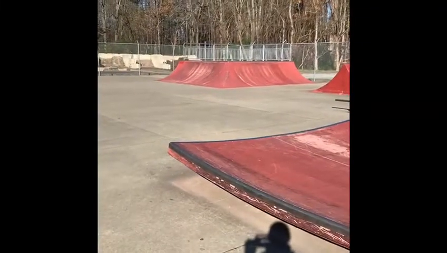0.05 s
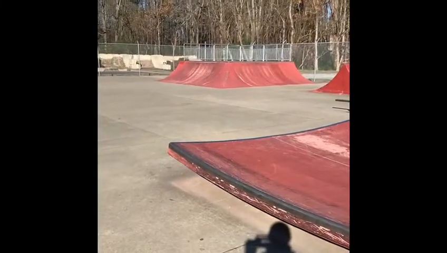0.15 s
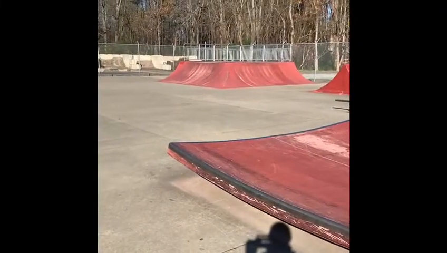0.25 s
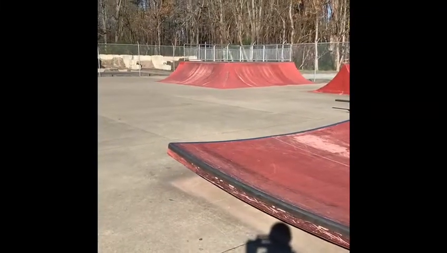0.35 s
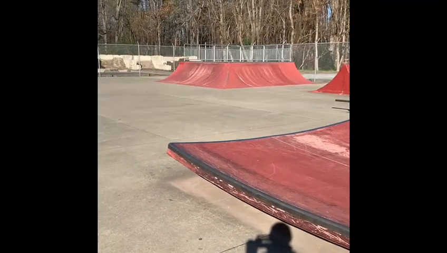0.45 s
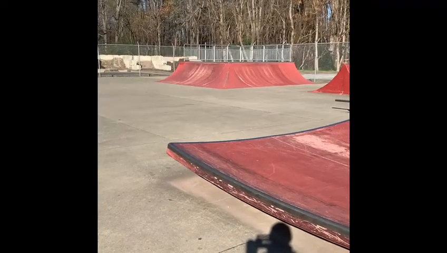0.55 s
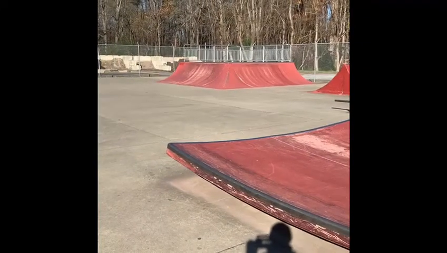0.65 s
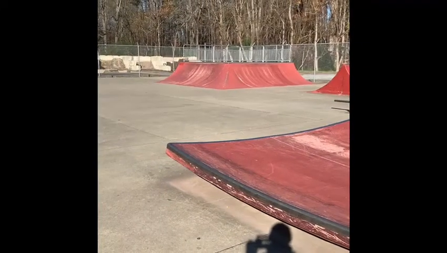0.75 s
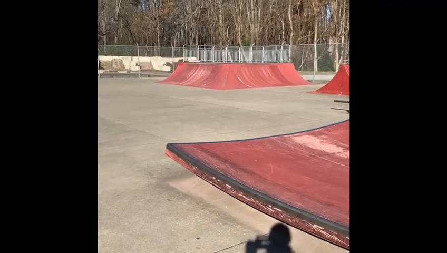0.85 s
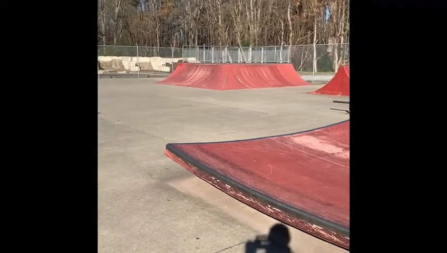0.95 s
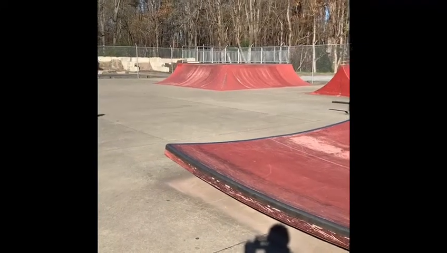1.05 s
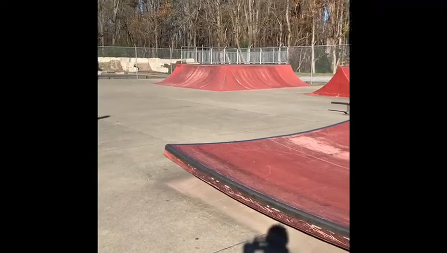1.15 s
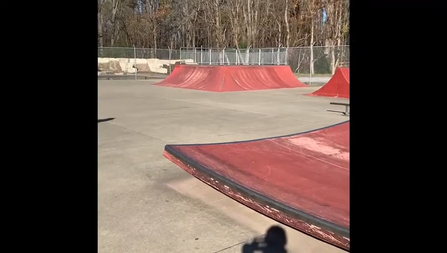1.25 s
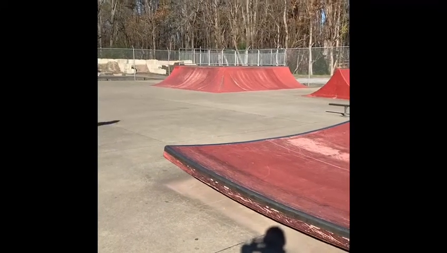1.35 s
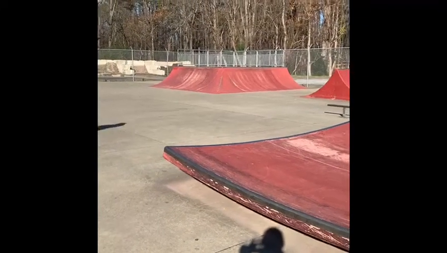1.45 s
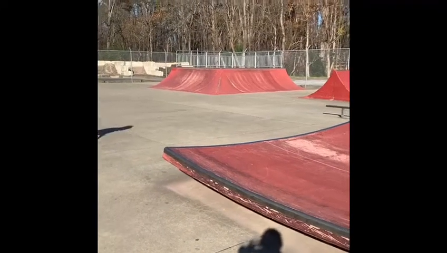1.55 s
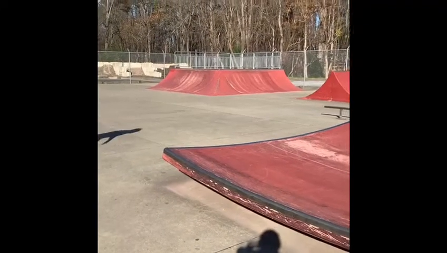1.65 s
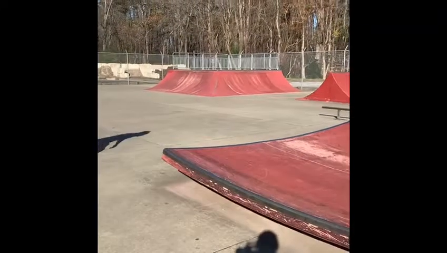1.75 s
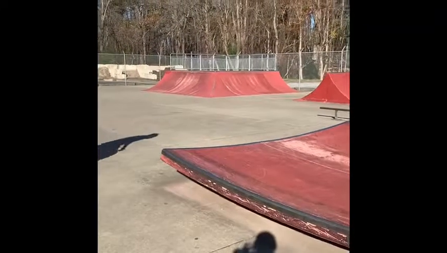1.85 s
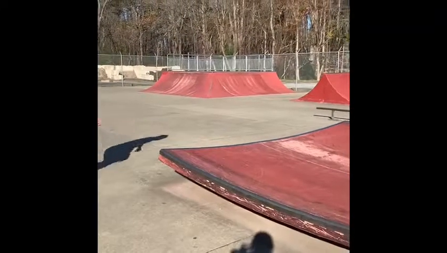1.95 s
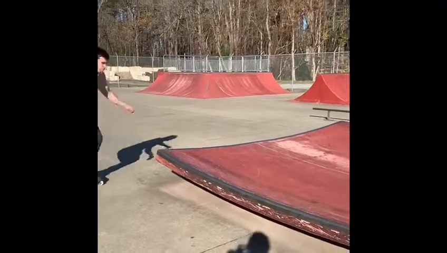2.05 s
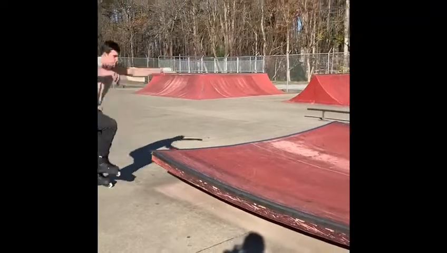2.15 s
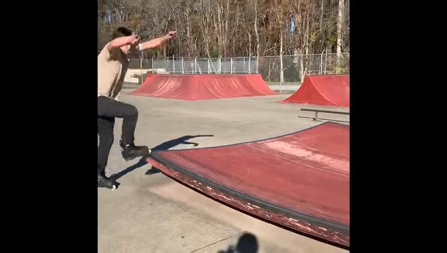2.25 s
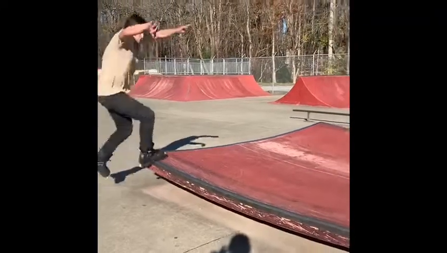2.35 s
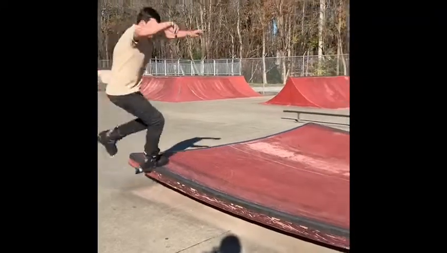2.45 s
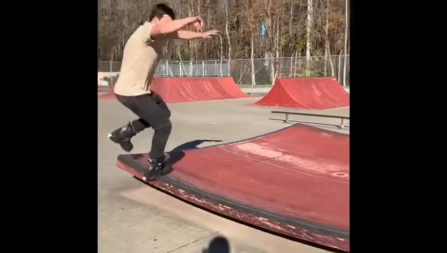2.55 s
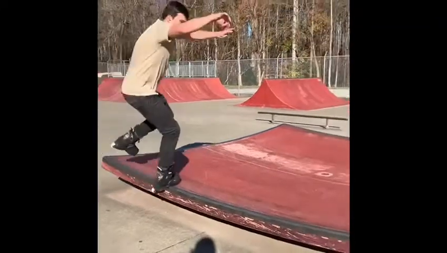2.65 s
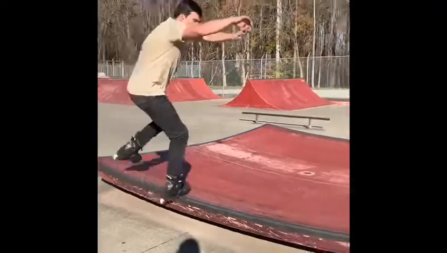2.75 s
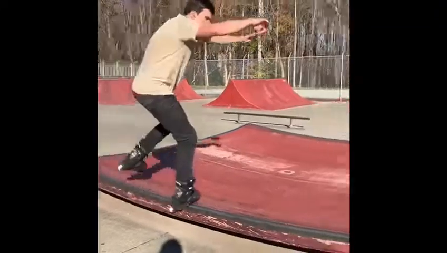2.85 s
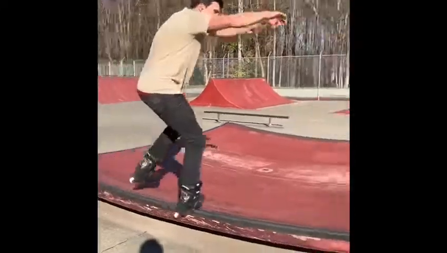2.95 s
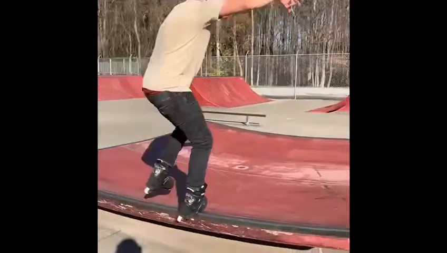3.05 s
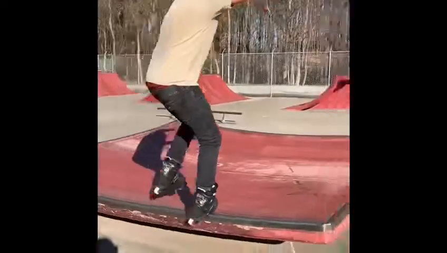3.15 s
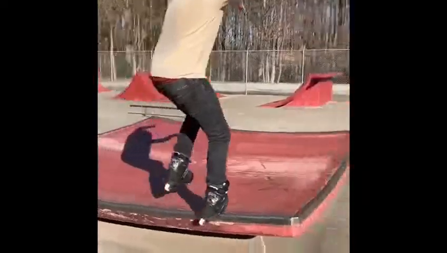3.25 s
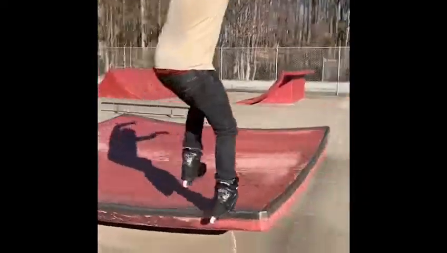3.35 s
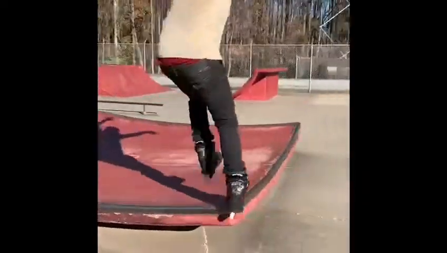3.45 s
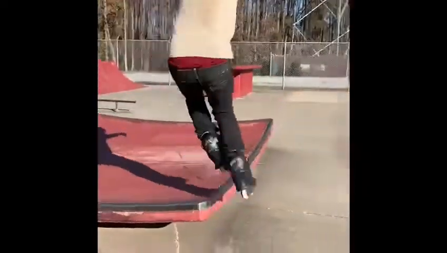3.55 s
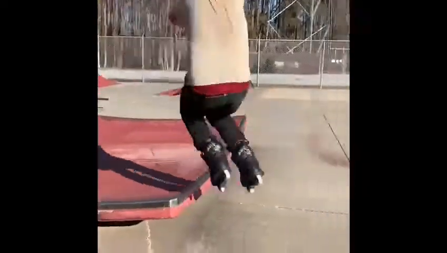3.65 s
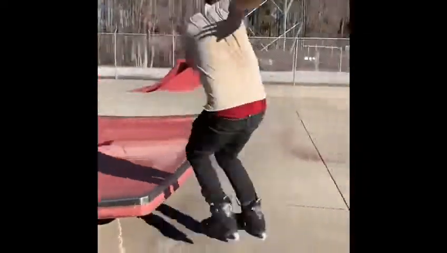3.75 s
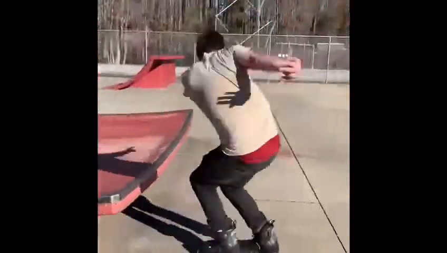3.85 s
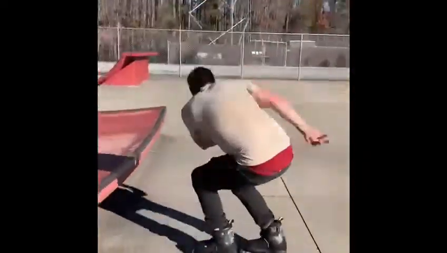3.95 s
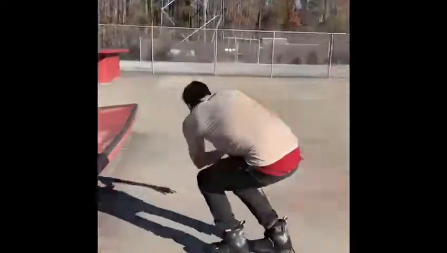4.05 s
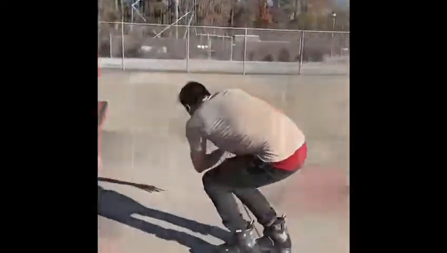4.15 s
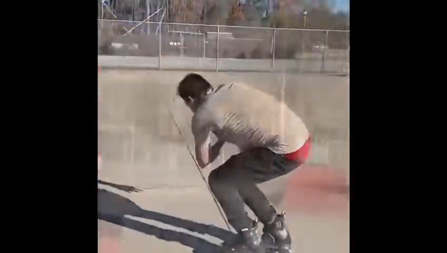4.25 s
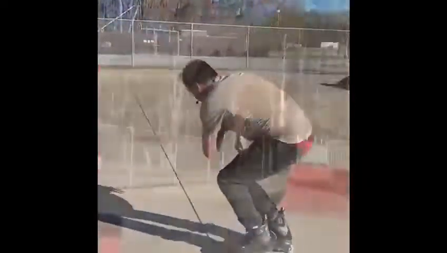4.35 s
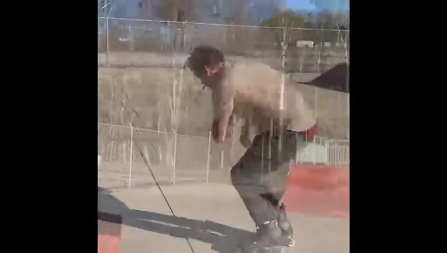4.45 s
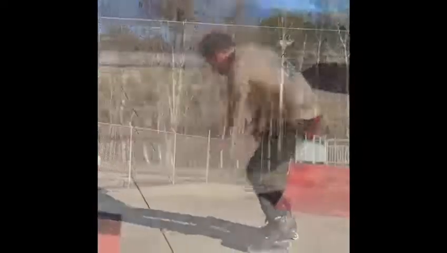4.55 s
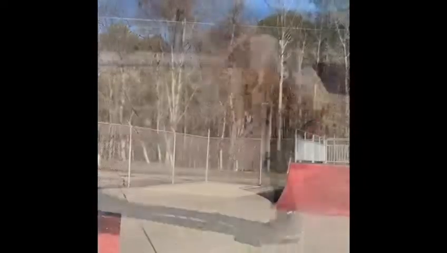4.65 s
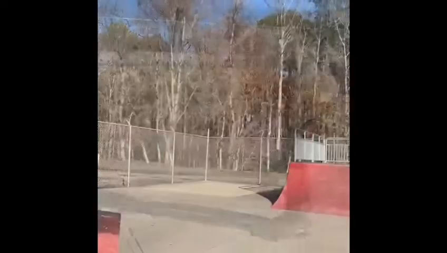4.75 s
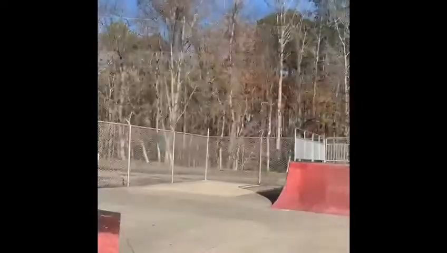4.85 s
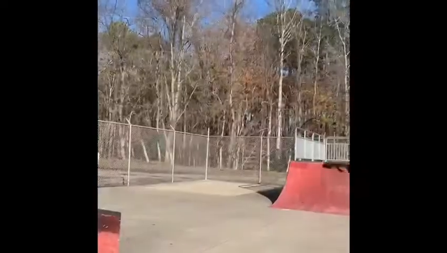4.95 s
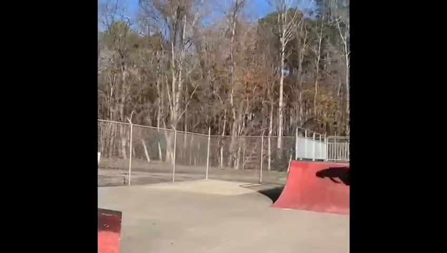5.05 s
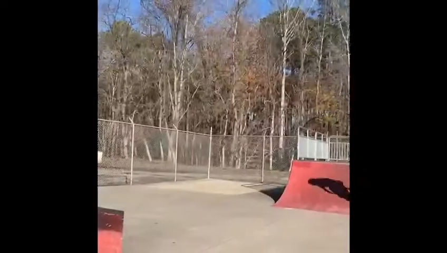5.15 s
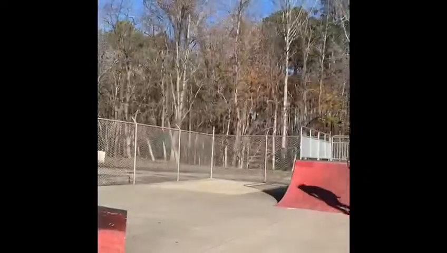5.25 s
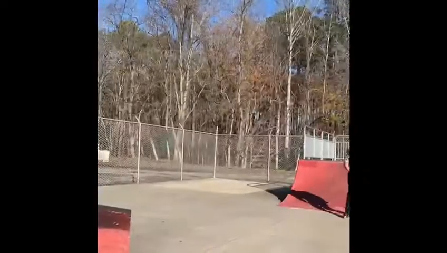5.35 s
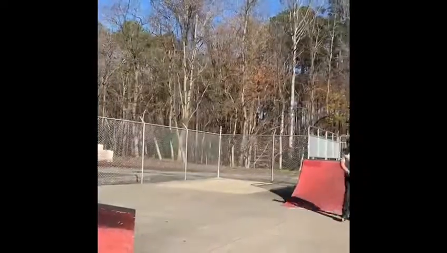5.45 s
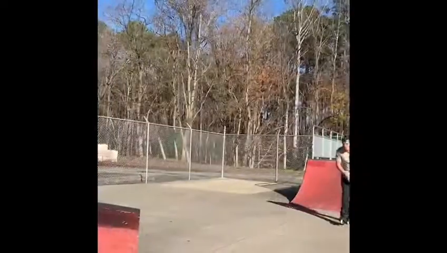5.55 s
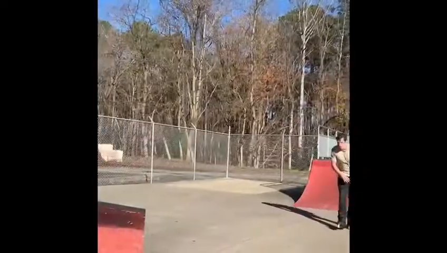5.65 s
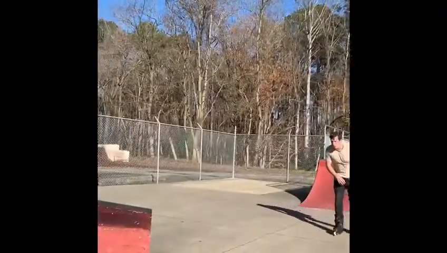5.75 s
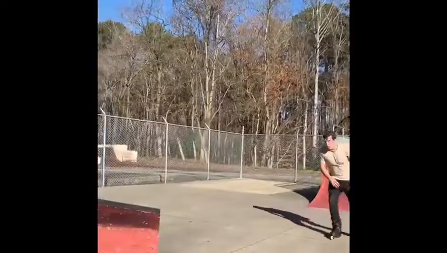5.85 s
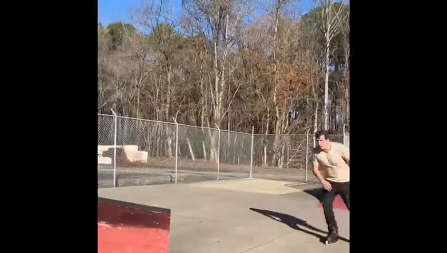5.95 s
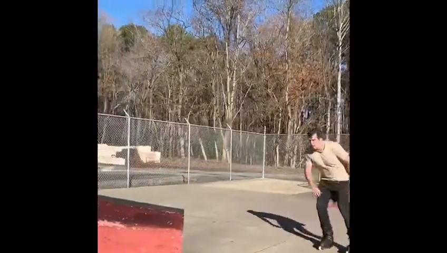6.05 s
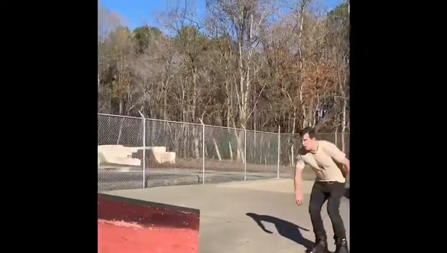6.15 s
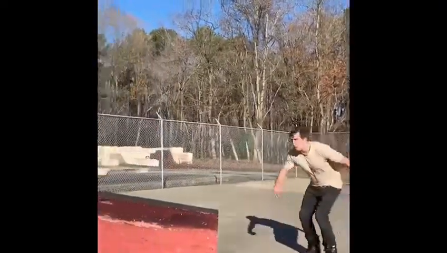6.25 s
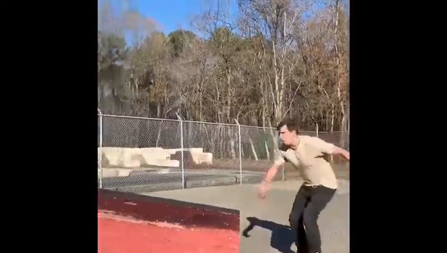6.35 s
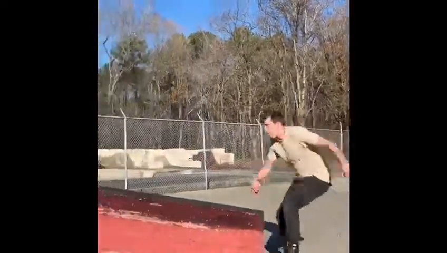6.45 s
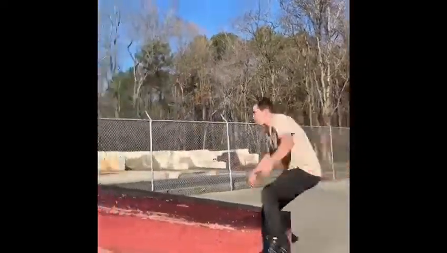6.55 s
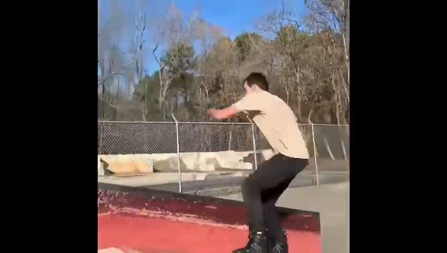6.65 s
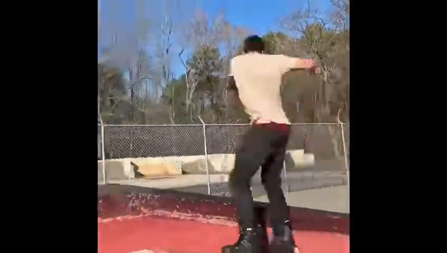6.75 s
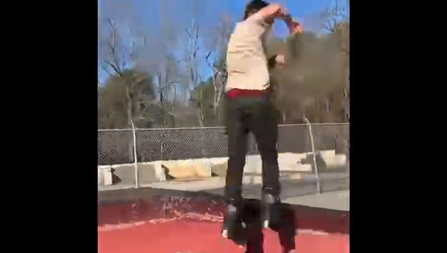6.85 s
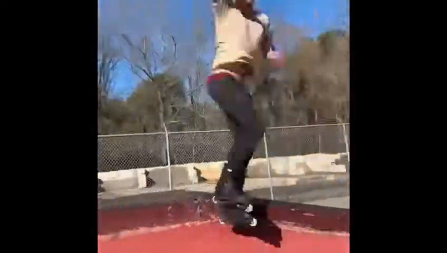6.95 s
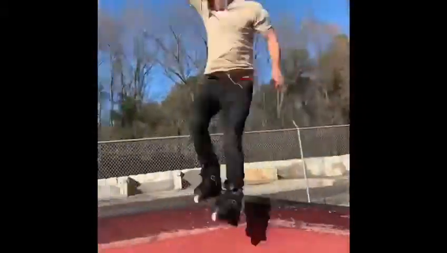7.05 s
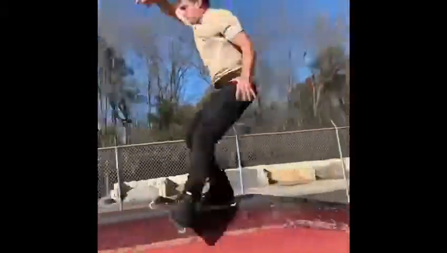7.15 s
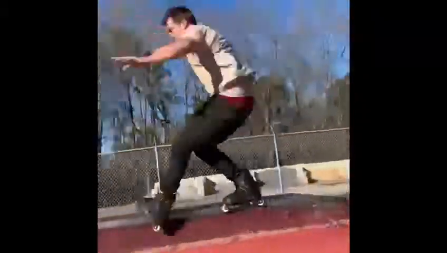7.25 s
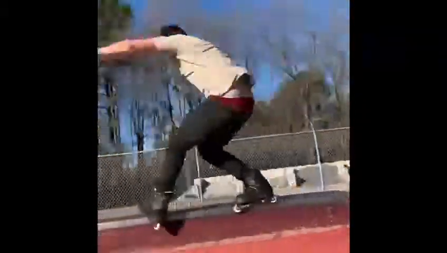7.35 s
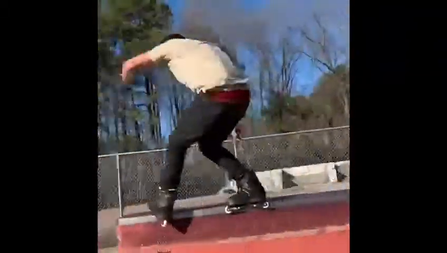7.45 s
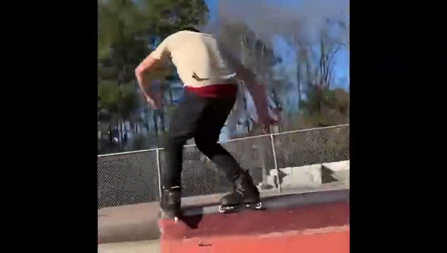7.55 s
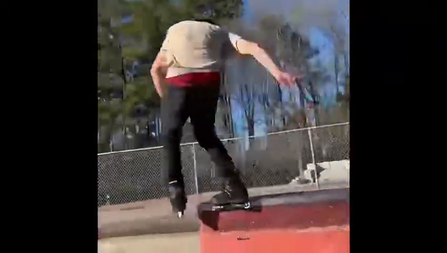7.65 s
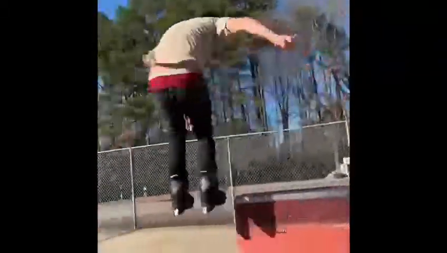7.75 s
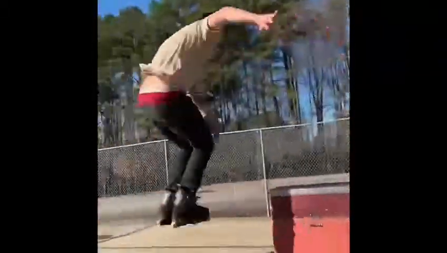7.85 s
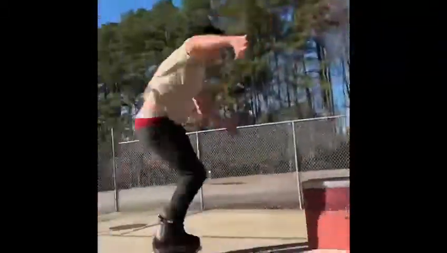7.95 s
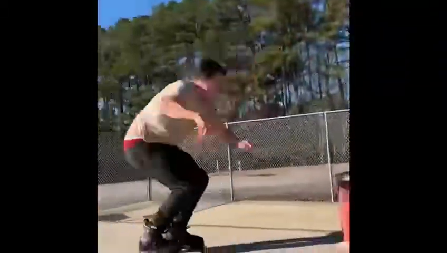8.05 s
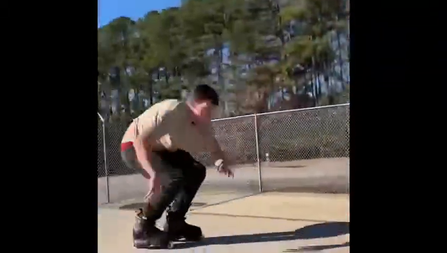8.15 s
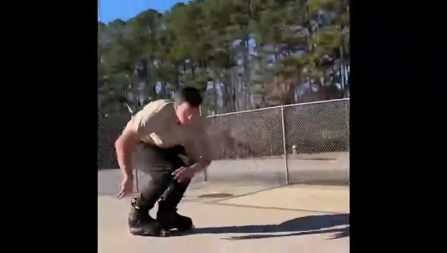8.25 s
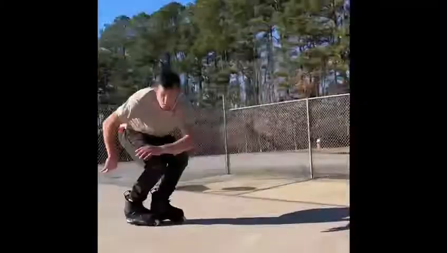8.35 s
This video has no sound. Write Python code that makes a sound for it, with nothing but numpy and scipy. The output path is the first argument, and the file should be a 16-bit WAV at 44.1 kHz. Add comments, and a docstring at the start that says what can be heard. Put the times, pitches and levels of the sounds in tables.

```python
"""Inline skater at a concrete park

A skater rolls up, grinds the edge of a hollow ramp, turns on a far ramp, then grinds a ledge and lands.
Noise filtered to a rumble, rattle and hiss makes the rolling; short bursts make each crack and knock.
Fading sines make the boots thud and the ramp boom. The ride is heard from two spots, one after the other,
with short echoes; wind noise buffets the microphone ports over a faint far hiss."""
import sys
import numpy as np
from scipy import signal
from scipy.fft import rfft, irfft, next_fast_len
from scipy.io import wavfile
from scipy.ndimage import uniform_filter1d

SR = 44100
rng = np.random.default_rng(int(sys.argv[2]) if len(sys.argv) > 2 else 0)


def materialize(psi):
    """Save the field psi as 16-bit PCM at rate SR to the path in sys.argv[1].

    A 1-D psi becomes a single channel; in a 2-D psi each row is a channel.
    """
    bounded = np.clip(np.atleast_2d(psi).T, -1, 1)
    quanta = np.round(bounded * 32767).astype(np.int16)
    wavfile.write(sys.argv[1], SR, quanta)


N = 370392   # length in samples

# rolling and grinding over time: time_s [s], level_db [dB], frame rattle_db and treble hiss_db [dB over level_db]
ROLLING = [(0, -60, -1, 3), (.35, -68, -31, 7), (.5, -55, -2, 9), (.66, -59.5, 8, -2), (.75, -63, -3, 1.5),
           (1.05, -63, 11.5, -1), (1.2, -56, 9, -3.5), (1.32, -58, -6, 7.5), (1.45, -55, 5, 10),
           (1.58, -56.5, -6.5, 1), (1.85, -51.5, 0, -19), (2.1, -51.5, -13, -10), (2.3, -63, 9, 2),
           (2.43, -46, 2, -13.5), (2.62, -48, -1, -6), (2.75, -47.5, -7, -11), (2.98, -43, -7, -8),
           (3.15, -40.5, -5, -6.5), (3.36, -40.5, -27, -8), (3.7, -43.5, 0, -1.5), (3.85, -49, -3.5, -5.5),
           (4.3, -55, 0.5, -1.5), (4.6, -63, -3, -8), (4.83, -68, -14, 0), (4.87, -41, -2, -13),
           (5.1, -38, -39, -12.5), (5.27, -42.5, -3, -11), (5.45, -44, -3.5, -18), (5.75, -44.5, -1, -9.5),
           (5.82, -37, 2.5, -10), (5.97, -43, 4, -8), (6.05, -41, 10.5, -12), (6.2, -36, 3, -3),
           (6.4, -35, -0.5, -8), (6.7, -44.5, -26, -3.5), (6.8, -50.5, -10, -1), (7.0, -48, -1, -4.5),
           (7.05, -46, -19, -16), (7.2, -47, 1, -5.5), (7.32, -50, 12.5, 11), (7.37, -51, 13.5, 5.5),
           (7.47, -45.5, 11, 5.5), (7.58, -52, 3, 2), (7.7, -55.5, 3, -3.5), (8.02, -49.5, 2.5, 0.5),
           (8.4, -48, -2, -7)]
# legs of the ride, each on its own ground (concrete, ramp edge, far ramp, ledge): start_s [s],
# wheel rumble_db, axle rattle axle_db, hollow boom_db [dB over the roll], boom_hz [Hz], bumpiness [power of the bumps]
RIDE_LEGS = [(0, 6.5, -6.5, 5, 181, 0.6), (1.65, 1.5, -2.5, -14, 200, 0.37), (2.2, 0, -6, 10.5, 238, 0.44),
             (2.6, -1.5, -7.5, 10, 169, 0.58), (3.601, 2.5, -5.5, -18, 232, 0.37),
             (4.8, -1, -20, -2, 286.2, 0.82), (5.3, -3, -11.5, -8.5, 230, 0.31),
             (6.2, 1.5, -12.5, 0.5, 178, 0.51), (7.0, -0.5, 0, -8.5, 243, 0.4),
             (7.75, 0, -2.5, -3, 184.7, 0.67)]
# heavy blows of boots and skates, each a crack with a thud: time_s [s], crack_db [dB], frame_hz [Hz],
# crack length_ms [ms], knock_db [dB], thud lag_ms [ms], thud_db [dB], thud_hz [Hz]
HEAVY_BLOWS = [(2.222, -11, 1775, 3.8, -26.5, 2.5, -13, 186), (2.241, -14.5, 1678, 9.3, -37, 4.3, -14, 240),
               (2.263, -13.5, 1644, 3.8, -33, 5.1, -15.5, 198),
               (2.285, -33, 1647, 16, -41.5, 1, -21.5, 180), (2.621, -26, 1685, 9.8, -46, 8.9, -23, 145),
               (3.009, -34, 1410, 10, -51, 1, -23.5, 72), (3.125, -23.5, 1120, 13, -46, 5, -24, 152),
               (3.704, -1, 1889, 4.7, -9.5, 3.3, 1, 250), (4.843, -5, 1700, 3.47, -15.5, 0.12, -11, 355),
               (5.157, -37.5, 940, 12, -36, 1.2, -11.5, 240), (5.188, -35.5, 1310, 10, -34, 0.1, -9, 301),
               (5.226, -28.5, 1110, 1.9, -29, 0.1, -17.5, 292), (6.22, -4.5, 910, 5.2, -18, 5, -6, 108),
               (6.253, -6.5, 1400, 6.3, -19, 4.8, -7, 102), (6.272, -7, 883, 3.3, -16.5, 2.8, -4, 100.8),
               (6.314, -4.5, 1520, 3.4, -16, 3.1, -4.5, 103),
               (7.017, -7.5, 1650, 3.64, -31, 1.68, -13, 260), (7.034, -3, 1784, 3.23, -35, 2.2, -8.5, 250),
               (7.1, -11, 1610, 3.4, -35, 0.75, -43, 324),
               (7.112, -20.5, 1695, 2.34, -28, 0.1, -21.5, 146.2),
               (7.879, -4.5, 1356, 4.6, -10.5, 5.8, -4, 113)]
# wheels knocking over seams and frames ticking: time_s [s], level_db [dB], frame_hz [Hz], length_ms [ms]
WHEEL_TICKS = [(0.489, -33, 1600, 5), (0.549, -37, 1750, 3.3), (0.742, -35.5, 4560, 1.3),
               (0.851, -51, 2470, 1.6), (0.944, -46, 2250, 1.5), (1.055, -36.5, 1640, 5.1),
               (1.148, -28, 2048, 6), (1.454, -31, 2448, 5), (1.536, -27.5, 1377, 2.4),
               (1.548, -28.5, 990, 3.6), (1.757, -32.5, 2050, 3.3), (1.795, -33, 2460, 2.3),
               (1.812, -35.5, 2494, 5.9), (1.855, -35, 2270, 2.6), (1.874, -29, 2215, 1.6),
               (1.969, -35, 2480, 2.8), (1.99, -37, 2510, 3.4), (2.019, -32, 2520, 4.4),
               (2.066, -35, 2550, 8.2), (2.427, -38, 1689, 4.3), (2.441, -29, 1705, 3.4),
               (2.454, -27.5, 1691, 6), (2.464, -32, 1660, 2.9), (2.494, -35, 1700, 4),
               (2.554, -25, 1652, 2.3), (2.562, -26, 1720, 6.3), (2.594, -31.5, 1660, 5.9),
               (2.666, -39, 1630, 11), (2.763, -36.5, 1601, 3.8), (2.839, -27.5, 1630, 9.8),
               (2.887, -28, 1589, 13.2), (2.941, -27, 1413, 6.3), (3.044, -30.5, 1027, 15),
               (3.161, -21, 1812, 8.6), (3.219, -32, 900, 6.2), (3.28, -29.5, 1618, 11),
               (3.338, -31, 885, 23), (3.489, -27.5, 1010, 5), (4.135, -37, 1800, 2.5),
               (4.167, -35, 1019, 1.9), (4.2361, -23, 1880, 3.2), (4.333, -30, 1250, 4.3),
               (5.077, -31, 1500, 3.6), (5.11, -34, 1270, 3.3), (5.382, -35.5, 3120, 2.8),
               (5.677, -25, 1100, 3.5), (5.845, -20.5, 1472, 4.4), (6.661, -25.5, 1630, 7.8),
               (7.027, -12, 1544, 3), (7.053, -24, 1719, 5.4), (7.132, -22, 1654, 4),
               (7.443, -28, 1555, 2.2), (7.518, -36, 1530, 2.3), (7.536, -28.5, 1660, 4),
               (7.674, -45, 1600, 7.9), (7.824, -12.5, 2860, 1.67), (7.863, -22, 1192, 5),
               (7.912, -32, 1380, 2.1), (7.927, -29.5, 1504, 1.8), (7.956, -28, 1460, 2),
               (8.072, -15.5, 2810, 1.7), (8.198, -38, 1617, 2.7), (8.21, -34, 1635, 5.6),
               (8.2503, -5.5, 2770, 1.37)]
# tone of bearings and grit: pitch_hz [Hz], level_db [dB per Hz, shape only]
BEARING_TREBLE = [(2500, 0), (3600, 13.5), (4600, 15), (5600, 14), (6800, 15), (8500, 13), (10500, 6.5),
                  (11800, 4.5), (12600, 7)]
FRAME_TOP_HZ = 2060   # the rolling frame rattle stops short above this


def rolling():
    """Grit under the wheels gives a rumble, rattles frame and axles and hisses; all jump together on bumps."""
    # tone of the wheels: pitch_hz [Hz], level_db [dB per Hz, shape only]
    wheel_body = [(200, -24), (350, 0.5), (650, -0.5), (1000, -1.5), (1700, -3.5), (2300, -13),
                  (3400, -13.5), (6000, -28.5)]
    axle_hz, axle_width_hz = 2580, 530
    rumble_db, axle_db, _, _, bumpiness = leg_columns()
    rattle_db, hiss_db = in_time(ROLLING)[1:]
    bumps = chatter(90, spread_db=9.5, length_ms=10.9) ** np.clip(bumpiness, 0, 2)

    rumble = colour(grit(3000, spread_db=13.5, smooth=2.16), wheel_body)
    rumble *= from_db(rumble_db) * bumps ** 0.33

    frame_hz = by_spot(1700, 1567) * (1 + 0.03 * drift(7.4))   # the pitch wanders with the load
    frame = resonance(grit(700, spread_db=-1.5, smooth=0.69), frame_hz, 370)
    frame = signal.sosfilt(signal.butter(6, FRAME_TOP_HZ, fs=SR, output="sos"), frame)
    frame *= from_db(rattle_db) * bumps

    axle_grit = grit(820, spread_db=-26.0, smooth=0.82)
    axles = from_db(axle_db) * bumps * resonance(axle_grit, np.full(N, axle_hz), axle_width_hz)

    hiss = colour(grit(5030, spread_db=5.5, smooth=0.72), BEARING_TREBLE)
    hiss *= from_db(hiss_db) * bumps ** 0.55
    return from_db(roll_db()) * (rumble + frame + axles + dulled(hiss))


def roll_db():
    """Level of the roll, falling away whenever the skates are in the air."""
    # wheels off the ground: start_s [s], end_s [s], drop_db [dB]
    airborne = [(3.386, 3.78, 14.5), (6.735, 6.975, 6.5), (7.605, 7.77, 7.5)]
    t = np.arange(N) / SR
    air_db = sum(drop_db * ((t > start) & (t < end)) for start, end, drop_db in airborne)
    lift_s = 0.031   # time over which the wheels leave or meet the ground
    return in_time(ROLLING)[0] - uniform_filter1d(1. * air_db, round(lift_s * SR))


def leg_columns():
    """Columns of the ride's legs, held for each leg and faded at the joins."""
    start_s, *columns = np.transpose(RIDE_LEGS)
    leg = np.searchsorted(start_s, np.arange(N) / SR, "right").clip(1) - 1
    fade_s = .08
    return [uniform_filter1d(c[leg], round(fade_s * SR)) for c in columns]


def grit(per_s, spread_db, smooth):
    """Grains of the surface knock the wheels at random, on top of a smooth hiss."""
    sizes = from_db(spread_db * np.minimum(rng.exponential(1, N), 3.5)) * rng.choice([-1, 1], N)
    knocked = rng.random(N) < per_s * from_db(3.0 * drift(60)) / SR   # the rate itself wavers
    return rms_one(rms_one(sizes * knocked) + smooth * rng.standard_normal(N))


def chatter(per_s, spread_db, length_ms):
    """Gain that jumps for a few milliseconds whenever a wheel skips over a bump; rms 1."""
    sizes = from_db(spread_db * np.minimum(rng.exponential(1, N), 3))
    skipped = rng.random(N) < per_s * from_db(5.0 * drift(6)) / SR   # bumps come in patches
    bump_shape = np.hanning(round(length_ms * SR / 1000))
    return rms_one(1 + signal.oaconvolve(sizes * skipped, bump_shape)[:N])


def dulled(x):
    """Distance takes the top off until the skater arrives."""
    arrives_s, fade_s, distant_hz = 2.09, 0.36, 5500   # the top returns during the fade before arrival
    distant = np.clip((arrives_s - np.arange(N) / SR) / fade_s, 0, 1)
    dull = signal.lfilter(*signal.butter(4, distant_hz, fs=SR), x)
    return x + distant * (dull - x)


def scuffs():
    """A wheel dragged sideways: a rasp builds up and stops short when the wheel grips again."""
    # drags: end_s [s], build_up_ms [ms], level_db [dB]
    drags = [(4.317, 34, -44.5), (5.799, 23.1, -47), (7.464, 18, -37.5)]
    scuff_hz, scuff_width_hz, treble_db = 2760, 890, 1
    t = np.arange(N) / SR
    drag = np.zeros(N)
    for end_s, build_up_ms, db in drags:
        build_up = np.minimum(t - end_s, 0) * 1000 / build_up_ms
        stop = np.maximum(t - end_s, 0) / 0.0025
        drag += from_db(db) * np.exp(build_up - stop)
    rasp = grit(1300, spread_db=6.0, smooth=0.73)
    peak = signal.lfilter(*signal.iirpeak(scuff_hz, scuff_hz / scuff_width_hz, fs=SR), rasp)
    return drag * (rms_one(peak) + from_db(treble_db) * colour(rasp, BEARING_TREBLE))


def cracks():
    """Every contact is a short burst in boot, frame and bearings; the frame's pitch depends on where it is hit."""
    # tone of the boot's shell: pitch_hz [Hz], level_db [dB per Hz, shape only]
    boot_shell = [(200, -5.5), (350, 7.5), (600, -12), (1000, -1.5), (2300, -3), (3500, -4.5),
                  (5000, -65.5), (7000, -21.5)]
    ringing_hz, ringing_waver = 1620, 0.0401   # the frame rings clearly near this pitch, wavering by this share
    short_is_bright = 0.13   # a contact's treble goes with (1 / length) to this power
    rows = [(*row[:4], 0) for row in HEAVY_BLOWS]
    rows = sorted(rows + [(*row, thinning(row[2])) for row in WHEEL_TICKS])

    strong, shell, bright = np.zeros((3, N))
    for s, db, hz, length_ms, boot_db in rows:
        start_s = s - length_ms / 1000
        add(strong, start_s, from_db(db) * contact(length_ms))
        add(shell, start_s, from_db(db + boot_db) * contact(length_ms))
        brightness = (4.5 / max(length_ms, 1)) ** short_is_bright
        add(bright, start_s, from_db(db) * brightness * contact(1.02 * length_ms))

    # the pitch is held from just before one contact to just before the next
    s, _, hz = np.transpose(rows)[:3]
    frame_hz = hz[np.maximum(np.searchsorted(s, np.arange(N) / SR + .006) - 1, 0)]

    bearings = dulled(colour(bright * rng.standard_normal(N), BEARING_TREBLE))
    shake, high = strong * rng.standard_normal(N), frame_hz > FRAME_TOP_HZ
    frame = resonance(shake * ~high, frame_hz, 370) + resonance(shake * high, frame_hz, 1470)
    near = np.exp(-(np.log(frame_hz / ringing_hz) / 0.2) ** 2)
    # a blow that rings the frame shakes the shell less
    boot = colour((1 - 0.29 * near) * shell * rng.standard_normal(N), boot_shell)
    wavering_hz = frame_hz * (1 + ringing_waver * drift(150))
    ringing = near * strong * np.sin(2 * np.pi * np.cumsum(wavering_hz) / SR)

    body = from_db(-8.5) * boot + from_db(-9.0) * frame + from_db(-9.5) * ringing
    return body + from_db(by_spot(-16.5, -10.5)) * bearings


def contact(length_ms, rise=0.55, tail_db=-28, tail_ms=25.0):
    """Envelope of a contact: a short swell up to the peak, then a fading burst with a faint rattling tail."""
    length_ms = max(length_ms, 1)
    ms = np.arange(round(.12 * SR)) / SR * 1000 - 2 * rise * length_ms   # 0 at the peak
    burst = np.exp(-(ms / (length_ms * np.where(ms < 0, rise, 1))) ** 2)
    return burst + from_db(tail_db) * np.exp(-np.abs(ms) / tail_ms) * (ms > 0)


def thinning(hz):
    """The higher a tick, the less body it has: change of level in dB, none at 1040 Hz."""
    db_per_octave, full_hz = 7.5, 1040
    return -db_per_octave * np.log2(hz / full_hz)


def knocks():
    """The sole of the boot knocks with every heavy blow and, softly, with every tick."""
    knock_hz, knock_width_hz, tick_knock_db = 525, 640, -13.5
    burst = np.zeros(N)
    for s, _, _, length_ms, knock_db, *_ in HEAVY_BLOWS:
        add(burst, s - .5 * length_ms / 1000, from_db(knock_db) * contact(1.21 * length_ms))
    for s, db, hz, length_ms in WHEEL_TICKS:
        gain = from_db(db + tick_knock_db + thinning(hz))
        add(burst, s - .5 * length_ms / 1000, gain * contact(length_ms))
    return resonance(burst * rng.standard_normal(N), np.full(N, knock_hz), knock_width_hz)


def thuds(cycles=9.0):
    """The boot squashes against the ground and rebounds a few times, fading by 60 dB over these cycles."""
    out, t = np.zeros(N), np.arange(round(.15 * SR)) / SR
    for s, *_, lag_ms, db, hz in HEAVY_BLOWS:
        fading = (1 - np.exp(-t / .001)) * 1000. ** (-t * hz / cycles)
        add(out, s + lag_ms / 1000, from_db(db) * fading * np.sin(2 * np.pi * hz * t))
    return out


def ramp(reach=.15):
    """The hollow ramp: wheels shake the modes near the favoured pitch, blows strike all, most those near the thud."""
    # ways the ramp can ring: pitch_hz [Hz], struck level_db [dB], struck ring time t60_s [s to fall 60 dB]
    ramp_modes = [(85, 5, 0.16), (116.3, 4.5, 0.14), (149.6, -1, 0.42), (179.5, -1, 0.21),
                  (198, 9.5, 0.075), (250.3, 5.5, 0.11), (288, 5, 0.13), (311.7, 3, 0.16)]
    hollow_db, favoured_hz = leg_columns()[2:4]
    boom_db = roll_db() + hollow_db

    thud_db, thud_hz = np.array(HEAVY_BLOWS)[:, 6:8].T
    at = [round((row[0] + row[5] / 1000) * SR) for row in HEAVY_BLOWS]
    hollow_at = [[leg[3] for leg in RIDE_LEGS if leg[0] <= row[0]][-1] for row in HEAVY_BLOWS]
    ring_db = thud_db + hollow_at - 16   # this far under thud plus hollow boom
    spread_db = rng.normal(0, 2.5, (len(at), len(ramp_modes)))

    shaken, power, struck = np.zeros((3, N))
    for k, (hz, db, t60) in enumerate(ramp_modes):
        share = np.exp(-(np.log(hz / favoured_hz) / reach) ** 2) + .08
        tone = rms_one(ring(rng.standard_normal(N), hz, 0.5 * t60))   # shaken modes ring half as long
        shaken += share * from_db(3.44 * drift(13.4)) * tone
        power += share ** 2
        away_db = 5.3 * np.abs(np.log2(hz / thud_hz))
        blows = np.zeros(N)
        blows[at] = from_db(ring_db + db + spread_db[:, k] - away_db) * (-1) ** k
        struck += ring(blows, hz, t60)

    soft = np.hanning(round(0.0023 * SR))   # urethane wheels spread the blow over two milliseconds
    struck = signal.oaconvolve(struck, soft / soft.sum())[:N]
    return from_db(boom_db) * shaken / np.sqrt(power) + struck


def ring(force, hz, t60):
    """A unit click sets a sine of height 1 ringing; it falls 60 dB in t60 seconds."""
    r, w = from_db(-60 / (t60 * SR)), 2 * np.pi * hz / SR
    return signal.lfilter([0, np.sin(w)], [1, -2 * r * np.cos(w), r * r], force + 1e-18)


def second_spot():
    """Share 0-1 of the second listening spot."""
    move_s, move_fade_s = 4.6, .2
    return np.clip((np.arange(N) / SR - move_s) / move_fade_s, 0, 1)


def by_spot(first, second):
    """A setting that glides from its value at the first spot to that at the second."""
    return np.interp(second_spot(), (0, 1), (first, second))


def at_ports(x):
    """Both ports hear the same sound, turned in phase against each other by the body that holds them."""
    # one table for each listening spot: pitch_hz [Hz], right_lead [half turns of phase]
    port_leads = [
        [(0, 0), (700, .08), (1400, .22), (2000, .05), (2700, .35), (3900, .15), (4700, .6), (5600, .45),
         (6400, 0), (7000, .3), (7700, .93), (9100, 1.1), (10300, 2), (13000, 2.6)],
        [(0, 0), (2000, .1), (2600, -.75), (3500, -.45), (4100, -.95), (5100, -1.07), (6000, -1.9),
         (7300, -2.15), (8300, -2.94), (9500, -3.06), (10500, -4), (13000, -4.6)],
    ]
    # direction over time: time_s [s], left_over_right_db [dB]
    side_levels = [(0, 0.5), (2.2, -1), (3.8, -0.6), (5.2, -2), (8.4, 1.2)]
    second, size = second_spot(), next_fast_len(N + 4096)
    hz = np.arange(size // 2 + 1) * SR / size
    out = np.zeros((2, N))
    for share, table in zip((1 - second, second), port_leads):
        lead = np.interp(hz, *np.transpose(table))
        turn = np.exp(.5j * np.pi * lead * [[-1], [1]])   # half back on the left, half forward on the right
        out += irfft(rfft(x * share, size) * turn, size)[:, :N]
    return out * from_db(in_time(side_levels)[0] / 2 * [[1], [-1]])


def echoes(x, dull_hz=7000):
    """Ground, fence and ramps give a few dull smeared returns, other ones in each ear."""
    # returns: delay_ms [ms], level_db [dB]
    returns = [(2, -14), (6, -17.5), (14, -22), (41, -33.5), (62, -41)]
    pulse = np.zeros((2, round(.12 * SR)))
    for ms, db in returns:
        i, size = round(ms * SR / 1000), round(min(ms, 9.2) * SR / 1000)
        smear = rng.standard_normal((2, size)) * np.hanning(size) / np.sqrt(size * 3 / 8)
        pulse[:, i:i + size] += from_db(db) * smear
    dull = signal.lfilter(*signal.butter(2, dull_hz, fs=SR), x)
    return signal.oaconvolve(dull[None], pulse, axes=1)[:, :N]


def breeze():
    """Lumpy low wind on the ports, with a higher flutter and a few short buffets."""
    # strength of the breeze: time_s [s], level_db [dB]
    wind_levels = [(0.0, -47), (1.47, -45), (1.8, -41.5), (6.01, -46), (6.36, -39), (7.27, -46), (8.4, -44)]
    # tone of the wind: pitch_hz [Hz], level_db [dB per Hz, shape only]
    wind_tone = [(20, -33), (40, -7.5), (59, 4), (135, -6.5), (168, -19.5), (200, -32), (260, -26.5),
                 (440, -120)]
    # lumps of wind: time_s [s], lump_db [dB over the breeze]
    wind_lumps = [(1.93, 4.5), (3.88, 9.5), (3.958, 10), (4.026, 15), (4.732, 8), (6.42, -3.5),
                  (6.801, 7.5), (6.887, 11.5), (6.96, 8)]
    buffet_s, flutter_hz, flutter_db = 0.033, 202, -17
    t = np.arange(N) / SR
    lumps_db = sum(db * np.exp(-((t - s) / buffet_s) ** 2) for s, db in wind_lumps)
    flutter = resonance(rng.standard_normal((2, N)), np.full(N, flutter_hz), 150)
    flutter *= from_db(flutter_db + lumps_db)   # lumps count twice here, so strong buffets sound higher
    gain = from_db(in_time(wind_levels)[0] + lumps_db + 2.0 * drift(24.0))
    return gain * (wide(wind_tone, side_db=-9) + flutter)


def far_sounds():
    """Far hiss from one direction and far traffic from all sides: filtered noise, swelling together."""
    # tone of the far hiss: pitch_hz [Hz], level_db [dB per Hz, shape only]
    far_tone = [(70, -9.5), (120, 17), (450, -2.5), (1700, -35), (3600, -41), (5500, -46), (7300, -21),
                (10500, -14.5), (11800, -13), (12600, -69)]
    # tone of the traffic: pitch_hz [Hz], level_db [dB per Hz, shape only]
    traffic_tone = [(70, -47), (120, -4), (450, -15), (1700, -19.5), (3500, -23.5), (6000, -65.5)]
    gain = from_db(-53 + 1.0 * drift(1.0))
    far = gain * colour(rng.standard_normal(N), far_tone)
    around = gain * from_db(-15.0) * wide(traffic_tone, side_db=2.0)
    return far, around


def wide(spectrum, side_db):
    """Stereo noise from a shared and an opposed draw."""
    mid, side = (colour(rng.standard_normal(N), spectrum) for _ in range(2))
    return mid + from_db(side_db) * side * [[1], [-1]]


def colour(x, spectrum, size=8192):
    """Causal (minimum-phase) filter with the given spectrum; white noise keeps its rms."""
    hz, db = np.transpose(spectrum)
    log_hz = np.log(np.arange(size // 2 + 1) * SR / size + 1)
    cepstrum = irfft(np.log(from_db(np.interp(log_hz, np.log(hz), db))))
    # folding the cepstrum forward in time makes the filter start at once
    cepstrum[1:size // 2] *= 2
    cepstrum[size // 2 + 1:] = 0
    pulse = irfft(np.exp(rfft(cepstrum)))
    return signal.oaconvolve(x, pulse / np.sqrt(np.sum(pulse ** 2)))[:N]


def resonance(x, hz, width_hz):
    """A resonance whose centre moves: shift down, low-pass twice, shift back; white noise keeps its rms."""
    turn, r = np.exp(2j * np.pi * np.cumsum(hz) / SR), np.exp(-np.pi * width_hz / SR)
    low = signal.lfilter([1], [1, -2 * r, r * r], x / turn)
    return np.sqrt(2 * (1 - r * r) ** 3 / (1 + r * r)) * np.real(turn * low)


def drift(rate_hz):
    """Slow random wandering around 0 with a spread of about 1, made at every 40th sample."""
    r = np.exp(-80 * np.pi * rate_hz / SR)
    slow = signal.lfilter([1], [1, -2 * r, r * r], rng.standard_normal(N // 40 + 2002))[2000:]
    return np.interp(np.arange(N) / 40, np.arange(len(slow)), rms_one(slow))


def in_time(rows):
    """Columns of a curve table, one value a sample."""
    s, *columns = np.transpose(rows)
    return [np.interp(np.arange(N) / SR, s, c) for c in columns]


def add(track, s, shape):
    """Mix a short shape in at a moment."""
    i = round(s * SR)
    track[i:i + len(shape)] += shape[:N - i]


def from_db(db):
    """Decibels to gain."""
    return 10 ** (np.asarray(db) / 20)


def rms_one(x):
    """Scale to unit rms."""
    return x / np.sqrt(np.mean(x ** 2) + 1e-20)


def scene():
    """Skater, echoes, breeze and far sounds."""
    skater = rolling() + scuffs() + cracks() + knocks() + thuds() + ramp()
    # the lowest bass of the skater is cut, as by a microphone's high-pass
    skater = signal.lfilter(*signal.butter(2, 39, "high", fs=SR), skater)
    far, around = far_sounds()
    return at_ports(skater + far) + echoes(skater) + breeze() + around


def record(dry):
    """The highest peaks are rounded, the top is cut."""
    cutoff_hz = 13600
    rounded = 1.189 * np.tanh(dry / 1.228)
    return signal.sosfilt(signal.cheby2(12, 80, cutoff_hz, fs=SR, output="sos"), rounded)


dry = scene()
out = record(dry)
materialize(out)
```